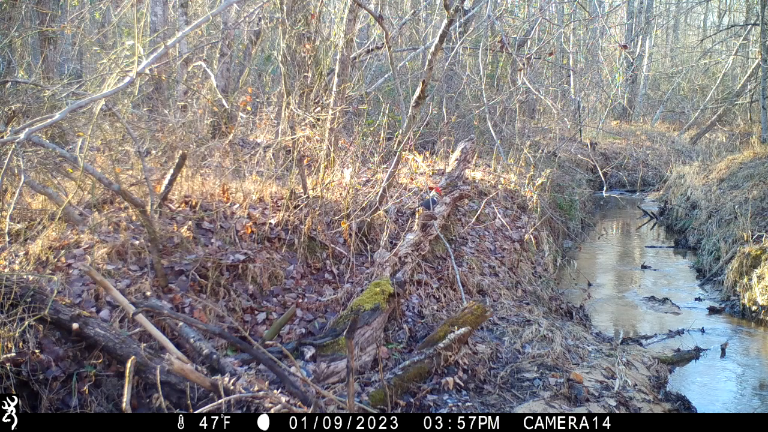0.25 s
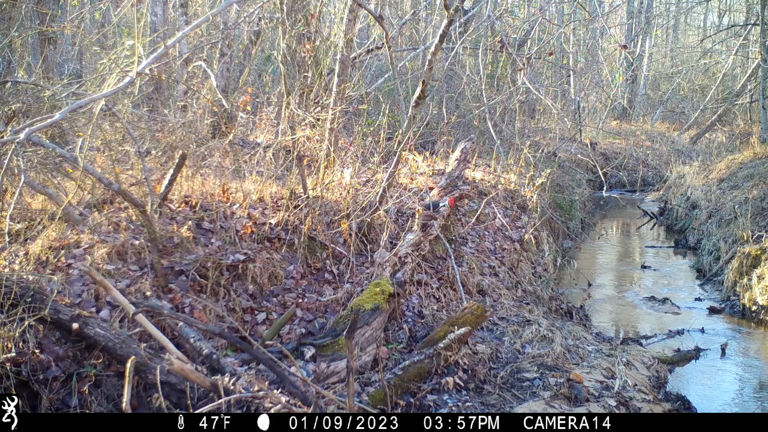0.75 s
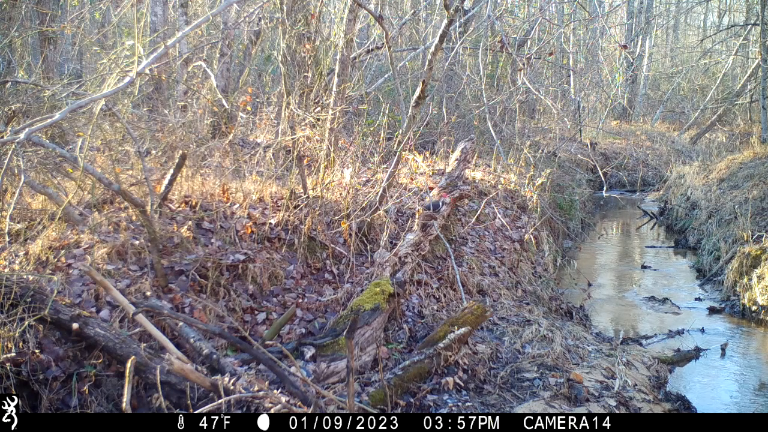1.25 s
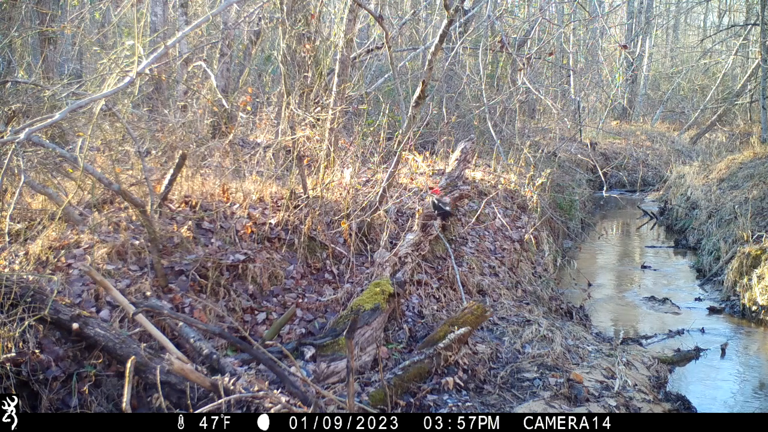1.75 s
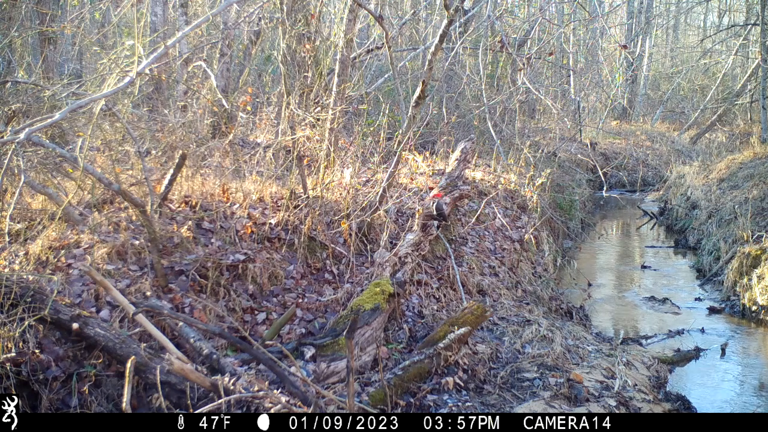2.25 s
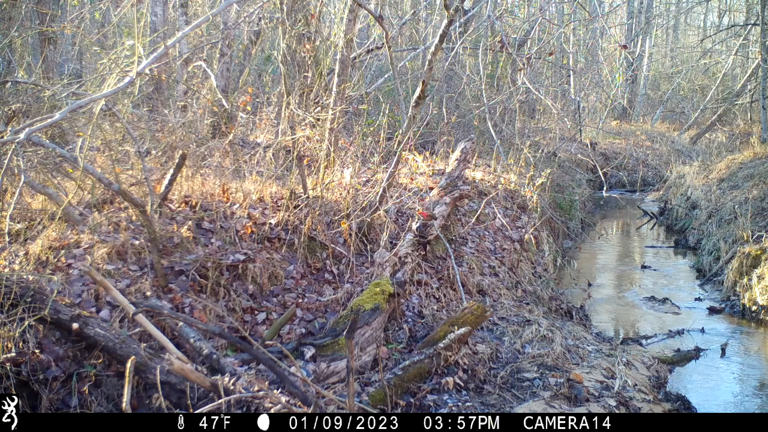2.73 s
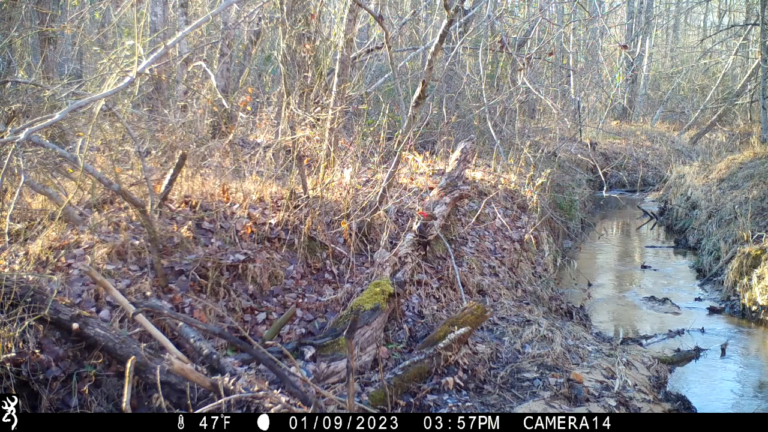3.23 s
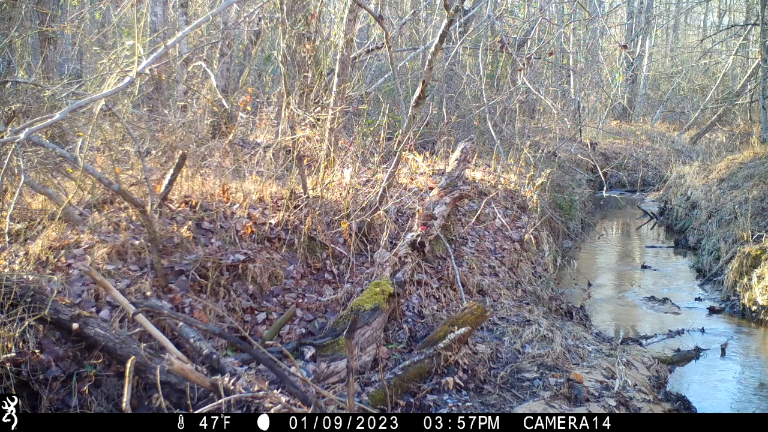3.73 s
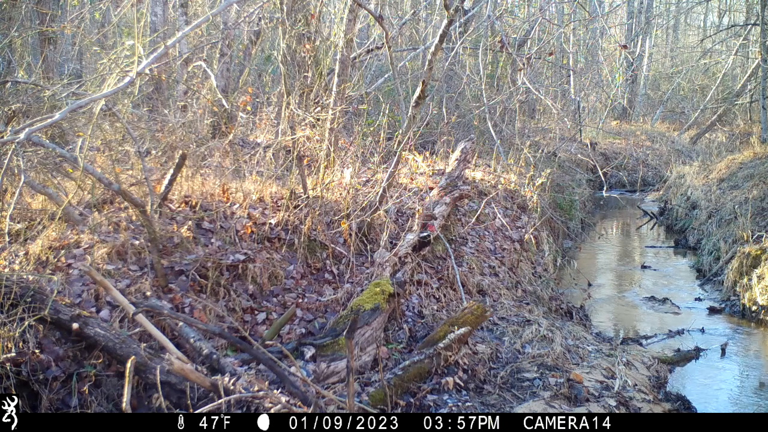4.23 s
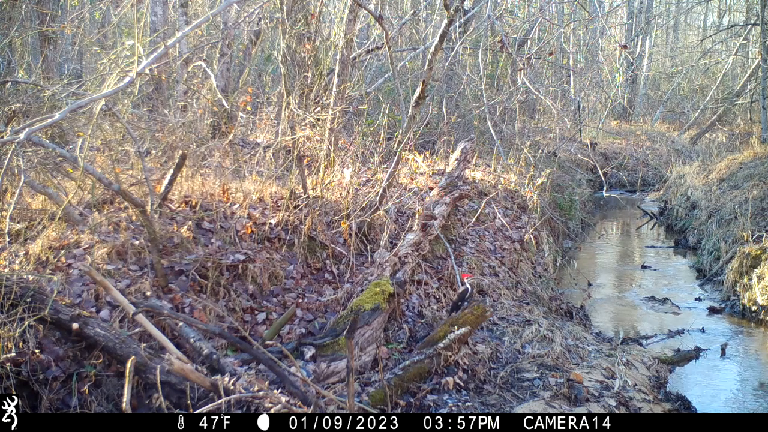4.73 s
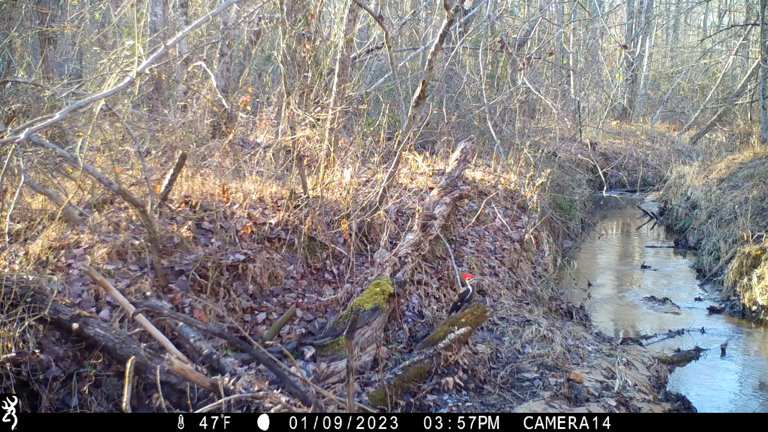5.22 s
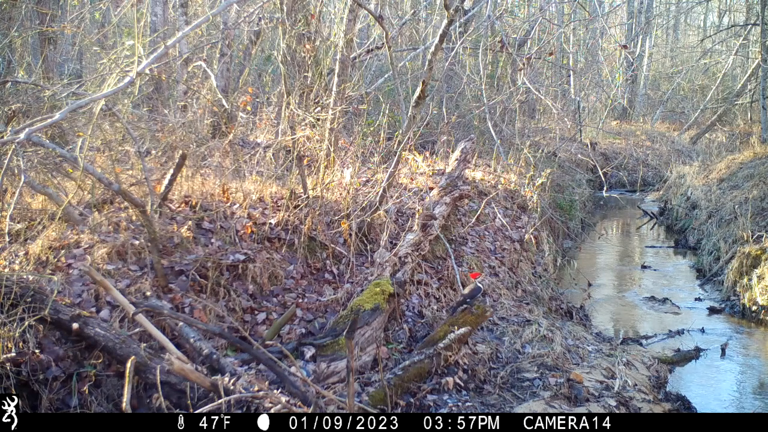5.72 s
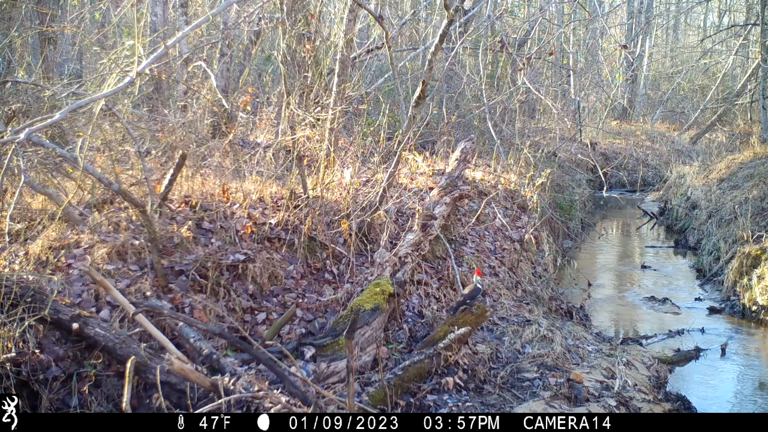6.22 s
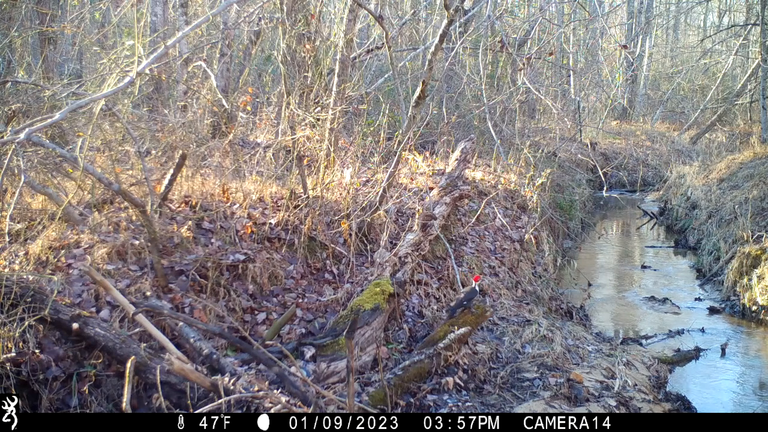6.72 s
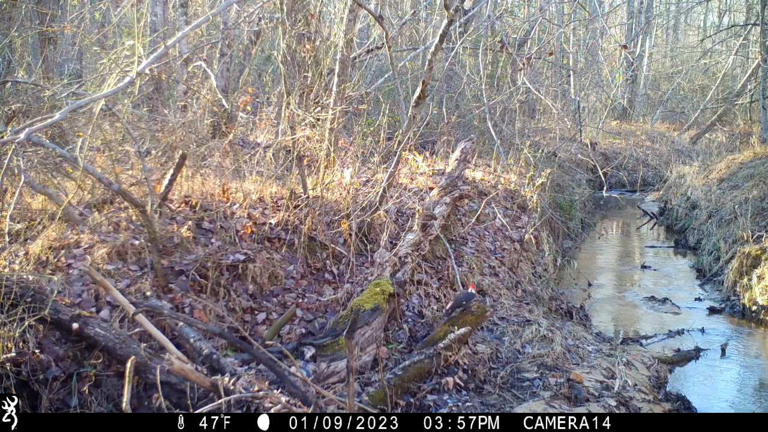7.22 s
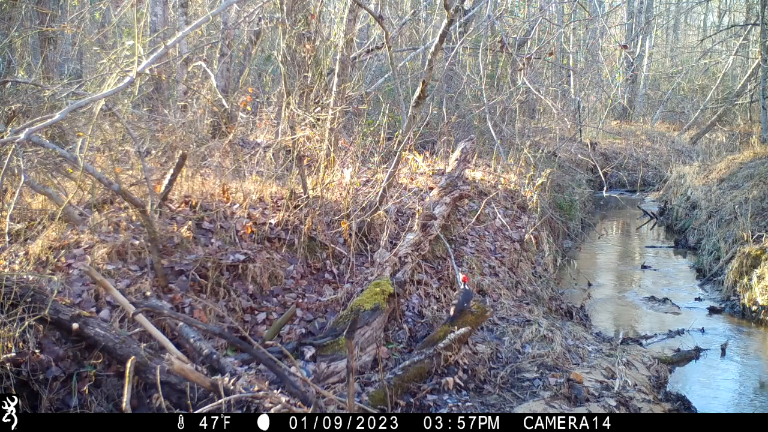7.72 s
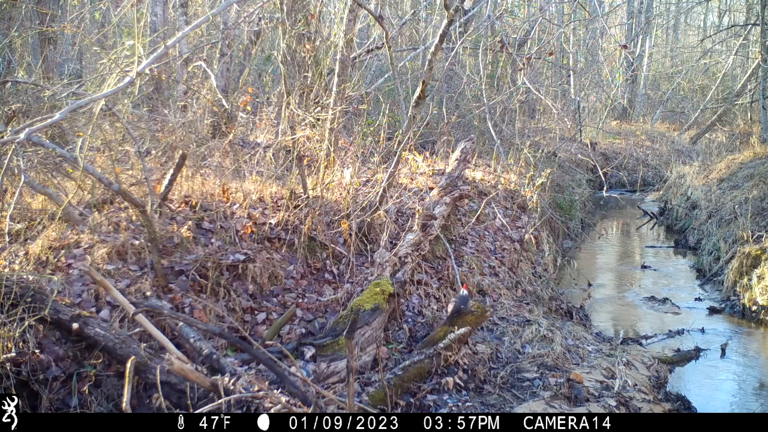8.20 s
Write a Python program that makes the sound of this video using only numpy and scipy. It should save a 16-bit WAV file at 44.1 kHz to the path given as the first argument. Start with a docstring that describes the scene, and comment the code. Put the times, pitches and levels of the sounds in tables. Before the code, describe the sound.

A woodpecker gives a steady run of short, arched yelping calls close by over a softly running creek, with a few faint knocks late.

```python
"""Short, arched woodpecker calls ring out close by, with a few knocks, over a running creek and a far drone.
Each call is a stack of five harmonics whose pitch sweeps up and down; the knocks ring the modes of dead wood.
Trunks throw the bird's sounds back as echoes and a faint tail. The creek is shaped noise with ringing bubbles,
the engine is a set of wavering sines, and the trail camera adds a thin whine and hiss."""
import sys
import numpy as np
from scipy import signal
from scipy.fft import rfft, irfft
from scipy.io import wavfile
from scipy.ndimage import uniform_filter1d

SR = 44100
rng = np.random.default_rng(int(sys.argv[2]) if len(sys.argv) > 2 else 0)


def generate_wav(signal):
    """Clip the signal to [-1, 1] and save it as 16-bit WAV at the path in sys.argv[1]."""
    frames = np.transpose(np.atleast_2d(signal))
    scaled = np.clip(frames, -1, 1) * 32767
    pcm = np.round(scaled).astype(np.int16)
    wavfile.write(sys.argv[1], SR, pcm)


N = 373086  # length of the scene in samples
TIME = np.arange(N) / SR  # seconds


def amp(db):
    """Turns decibels into a gain."""
    return 10 ** (np.asarray(db) / 20)


def unit(x):
    """Scales a signal to an rms level of 1."""
    return x / np.sqrt(np.mean(x ** 2) + 1e-20)


def bump(x, centre, width):
    """A bell curve of height 1."""
    return np.exp(-((x - centre) / width) ** 2)


def along(points, hz):
    """Reads a (frequency, value) table at any frequency, on a log-frequency axis."""
    point_hz, value = np.transpose(points)
    return np.interp(np.log(hz + 1), np.log(point_hz), value)


def add(mix, start_s, sound):
    """Mixes a sound in at a given time, cutting off what runs past the end."""
    part = mix[round(start_s * SR):][:len(sound)]
    part += sound[:len(part)]


def wander(rate_hz):
    """A random curve of rms 1: noise whose spectrum fades out above about rate_hz."""
    hz = np.fft.rfftfreq(N, 1 / SR)
    spectrum = rfft(rng.standard_normal(N))
    return unit(irfft(spectrum * np.exp(-(hz / rate_hz) ** 2), N))


def tone(hz, db):
    """A sine from a random starting phase; its pitch and rms level may be curves."""
    turns = np.cumsum(hz * np.ones(N)) / SR + rng.random()
    return np.sqrt(2) * amp(db) * np.sin(2 * np.pi * turns)


def whine(whine_hz=7788.4, level_db=-94.5, frames_per_s=59.45, count=5):
    """A thin electronic tone whose sign flips with each picture frame, which spreads it into close lines."""
    odd = 1 + 2 * np.arange(count)  # a few odd harmonics make a softened square wave
    flips = sum(np.sin(np.pi * k * frames_per_s * TIME) / k for k in odd)
    return tone(whine_hz, level_db) * unit(flips)


def engine(low_hz=74.0, high_hz=93.3, low_db=-1, high_db=0.0, waver=.004):
    """A far drone: sines whose pitches waver together, two of them fading in and out."""
    # steady tones: (frequency [Hz], rms level [dB])
    steady = [(44, -86.5), (149, -88.5)]
    # fading tones, before low_db and high_db are added: (time [s], low tone [dB], high tone [dB])
    swell = [(0.0, -82, -84), (0.04, -90, -79), (0.35, -84, -86), (1.08, -83, -76.5), (1.39, -89, -79),
             (2.17, -82.5, -77), (2.31, -92, -76), (2.87, -80, -86), (3.25, -71.5, -75), (4.0, -80, -76.5),
             (4.15, -75, -74), (4.64, -86.5, -87), (5.75, -69, -72.5), (6.6, -92, -71), (7.0, -78, -71),
             (8.2, -83, -74), (8.41, -78, -78), (8.46, -84, -85)]
    speed = 1 + waver * wander(2)
    s, low_swell, high_swell = np.transpose(swell)
    low = tone(low_hz * speed, low_db + np.interp(TIME, s, low_swell))
    high = tone(high_hz * speed, high_db + np.interp(TIME, s, high_swell))
    return low + high + sum(tone(hz * speed, db) for hz, db in steady)


def creek(level_db=-53, patchy_db=0.4, swell_db=0.26):
    """Running water some way off: shaped noise with small drifting patches and a slight swell."""
    # shape of the wash, only relative: (frequency [Hz], level per Hz [dB])
    wash_shape = [(25, -26.5), (60, -16.5), (130, -14), (250, -7), (450, -3), (800, -0.5), (1250, -0.5),
                  (2000, -4), (2800, -9.5), (4000, -19), (5200, -27), (6500, -31), (8000, -37.5),
                  (15000, -57.5)]
    frames, hz = N // 256 + 5, np.fft.rfftfreq(1024, 1 / SR)
    real, imaginary, patches = rng.standard_normal((frames, len(hz), 3)).T
    patches = uniform_filter1d(patches, size=9, axis=0)  # smooth over frequency
    patches = unit(uniform_filter1d(patches, size=10, axis=1))  # smooth over time
    gain = amp(along(wash_shape, hz)[:, None] + patchy_db * patches)
    spectrum = (real + 1j * imaginary) * gain
    wash = signal.istft(spectrum, nperseg=1024, noverlap=768)[1][:N]
    return amp(level_db + swell_db * wander(3.4)) * unit(wash)


def bubbles(level_db=-66, per_s=5, low_hz=550, high_hz=2300, cycles=9, glide=0.073):
    """Small bubbles in the riffle: each rings briefly and rises in pitch."""
    out = np.zeros(N)
    for hz in np.geomspace(low_hz, high_hz, 20):  # 20 bubble sizes, each with per_s pops a second
        turns = hz * np.arange(SR // 20) / SR
        ring = np.sin(2 * np.pi * turns * (1 + glide * turns / cycles / 2))
        ring *= np.exp(-turns / cycles) * (1 - np.exp(-turns))  # soft start, then dying away
        pops = (rng.random(N) < per_s / SR) * rng.random(N) ** 2  # mostly weak pops
        out += signal.oaconvolve(pops, ring)[:N]
    return amp(level_db) * unit(out)


def forest(x, tail_db=-20, scatter_hz=1300, count=4):
    """A few single echoes from near trunks, then a faint scattered tail that changes as the bird moves about."""
    # echoes from near trunks and the bank: (delay [s], level [dB])
    trunks = [(.0093, -21), (.0148, -17), (.0215, -23), (.031, -32.5)]
    # how long the tail rings among the trees: (frequency [Hz], time to fall by 60 dB [s])
    ring_times = [(300, 0.33), (900, 0.55), (1900, 0.51), (4000, 0.12), (8000, .2)]
    x = signal.lfilter(*signal.butter(1, scatter_hz, "high", fs=SR), x)  # thin trunks throw back little bass
    # each tail starts as one second of random reflections, about 2000 of them
    taps = rng.standard_normal((count, SR)) * (rng.random((count, SR)) < 2000 / SR)
    hz, t, z = signal.stft(taps, SR, nperseg=256)
    decay = amp(-60 * t / along(ring_times, hz)[:, None])
    tails = signal.istft(z * decay * (t > .008), SR, nperseg=256)[1]
    # the bird's sound drifts between the tails
    shares = np.array([wander(1.1) for _ in tails])
    shares /= np.linalg.norm(shares, axis=0)
    out = amp(tail_db) * sum(signal.fftconvolve(x * share, tail / np.linalg.norm(tail))[:N]
                             for share, tail in zip(shares, tails))
    for delay, db in trunks:
        add(out, delay, amp(db) * x)
    return out


def knocks(contact_s=0.0011):
    """The bill strikes soft dead wood, whose modes die at once."""
    # strikes: (time [s], gain [dB])
    strikes = [(6.3547, -27), (7.204, -32), (8.132, -40)]
    # modes of the dead branch: (frequency [Hz], relative level [dB], time to fall by 60 dB [s])
    branch = [(236, -20.5, 0.069), (397, -16.5, 0.042), (796, -11, .015), (1180, 4, 0.01),
              (1330, -4.5, 0.012), (1930, -11, 0.016)]
    out, t = np.zeros(N), np.arange(SR // 8) / SR
    ring = sum(amp(db - 60 * t / t60) * np.sin(2 * np.pi * hz * t) for hz, db, t60 in branch)
    ring *= 1 - np.exp(-t / contact_s)  # the soft contact rounds the start
    for s, db in strikes:
        add(out, s, amp(db) * ring)
    return out


def call_arch(u, slack, strain, burst):
    """Pitch as a share of the crest pitch: an arch that strain starts higher, holds down and then cracks upwards."""
    arch = 1 - 0.45 * slack + 0.34 * burst
    arch += 0.073 * strain * bump(u, 0, 0.25)  # the crack at the crest
    return arch - 0.06 * strain * bump(u, -.6, 0.28)  # held down until it cracks


def call_voice(hz, u, slack, strength_db, strain, flicker_now):
    """Five harmonics of the pitch, each following the arch; a narrow throat resonance lifts the fifth."""
    # first four harmonics, one row each: (loss at the feet of the arch [dB], dip at the crest [dB],
    #                                      further dip at full strain [dB], gain from crest to end [dB])
    harmonics = [(22.5, 0, -1, -3), (12.1, 1.5, 11.5, 1.1), (4, 12.5, 3, 3), (4, -1, -1.5, -5.5)]
    crest = bump(u, 0, 0.45)
    first, octave, third, fourth = (
        db - loss_db * slack - (dip_db + strain_db * strain) * crest + lean_db * u
        for db, (loss_db, dip_db, strain_db, lean_db) in zip(strength_db, harmonics))
    # the fifth is faint against the octave, brighter under strain
    fifth = octave - 49 + 9.5 * strain + 5.5 * bump(5 * hz, 4950, 250)
    levels = [first, octave, *([third, fourth, fifth] + flicker_now)]
    phase = 2 * np.pi * np.cumsum(hz) / SR
    return sum(amp(db) * np.sin(k * phase) for k, db in enumerate(levels, 1))


def call_effort(t, u, rise, fall, catch_db, strain, burst):
    """Loudness in dB: quick attack and release, a brief catch before the crest, and pushes under strain."""
    attack = 1603 * np.maximum(-t - rise, 0)  # dB, at 1603 dB a second
    release = 2400.5 * np.maximum(t - 0.69 * fall, 0)  # dB, at 2400.5 dB a second
    catch = catch_db * bump(u, -0.79, 0.17)
    # strain makes the start harder and swells once more on the way down
    forced = 5 * burst + 5.5 * strain * bump(u, 0.55, 0.13)
    return forced - attack - release - catch


def yelp(row, jitter, shimmer, flicker):
    """One call: the pitch sweeps up to a crest and down again, trembling least at the crest."""
    s, crest_hz, length, *strength_db, catch_db, strain = row
    rise, fall = .44 * length, (1 - .44) * length  # seconds before and after the crest
    # strain trims the lead-in
    t = np.arange(-1.6 * rise * (1 - .19 * strain), 1.7 * fall, 1 / SR)
    u = t / np.where(t < 0, rise, fall)  # -1 one rise before the crest, +1 one fall after it
    now = round(s * SR) + np.arange(len(t))
    loose = (.5 + np.minimum(u ** 2, 1)) * (1 + 1.4 * strain)  # rougher under strain
    burst = strain * np.maximum(-u - .75, 0)  # extra force at the start
    slack = 1 - np.exp(-abs(u / 1.15) ** 2.62)  # 0 at the crest, near 1 at the feet; flat on top
    hz = crest_hz * call_arch(u, slack, strain, burst) * (1 + loose * jitter[now])
    voice = call_voice(hz, u, slack, strength_db, strain, flicker[:, now])
    effort_db = call_effort(t, u, rise, fall, catch_db, strain, burst) + loose * shimmer[now]
    return s + t[0], voice * amp(effort_db) * signal.windows.tukey(len(t), .16)


def woodpecker(unsteady=0.012, shimmer_db=0.9, flicker_db=3.0, count=3):
    """The run of calls: pitch and strength tremble slightly, and each upper harmonic flickers by itself."""
    # one row a call; levels are starting points that the voice then shapes; a negative catch is a lift:
    # (time of the crest [s], crest pitch [Hz], length [s], fundamental [dB], octave [dB], third harmonic [dB],
    #  fourth harmonic [dB], depth of the catch in the voice [dB], strain [0-1])
    calls = [(0.1938, 926, 0.042, -39, -36, -44, -64, 2, .05),
             (0.4684, 980, 0.045, -33.5, -40.5, -54, -68, 4, 0.08),
             (0.9987, 962, 0.045, -34, -36.5, -49.5, -72, 5, 0.01),
             (1.334, 941, 0.038, -36, -30.5, -41, -72, 9.5, 0),
             (1.7887, 1032, 0.04, -32, -27.5, -45.5, -63.5, 4.5, 0.23),
             (2.047, 932, 0.034, -34.5, -28.5, -38, -68, 4.5, 0.11),
             (2.315, 983, 0.043, -32, -27.5, -41, -79, 16, 0.21),
             (2.534, 955, 0.037, -37.5, -32.5, -41.5, -69, -2.5, 0),
             (2.78, 867, 0.041, -40, -35.5, -45, -76, -2, 0.29),
             (3.0705, 908, 0.042, -36, -33.5, -45.5, -73, 1.5, 0),
             (3.3016, 916, 0.043, -36, -34, -46, -73, -2.5, 0),
             (3.5364, 950, 0.051, -34.5, -34.5, -47, -66, 0.5, 0.13),
             (3.8036, 934, 0.042, -34, -30, -44.5, -66, 8.5, 0.2),
             (4.1155, 933, 0.043, -34.5, -35.5, -41.5, -66, 5, 0.09),
             (4.3273, 951, 0.047, -37.5, -29.5, -51, -64.5, -3, .62),
             (4.4878, 956, .046, -33.5, -31, -40.5, -69, 3, .95),
             (4.749, 969, 0.033, -32, -27, -40.5, -68, 9.5, 0),
             (4.969, 981, 0.038, -33, -26, -40.5, -72, 7, 0.06),
             (5.245, 972, .041, -33, -28, -41, -70.5, 6, 0),
             (5.4704, 924, 0.036, -35.5, -26, -44.5, -68, 6, 0.5),
             (5.7503, 919, 0.039, -39, -26, -45, -69, -1, 0.15),
             (6.0205, 925, 0.039, -38.5, -26, -43, -67, 0.5, 0.15),
             (6.8042, 915, 0.04, -38.5, -29.5, -43, -65, 1, 0.14)]
    out = np.zeros(N)
    jitter = unsteady * wander(170)  # share of the pitch; each call scales it
    shimmer = shimmer_db * wander(220)  # dB; each call scales it
    flicker = flicker_db * np.array([wander(47) for _ in range(count)])  # third to fifth harmonic
    for row in calls:
        add(out, *yelp(row, jitter, shimmer, flicker))
    return out


def scene():
    """The bird among the trees, over the creek and the drone."""
    bird = woodpecker() + knocks()
    return (bird + forest(bird) + creek() + bubbles() + engine())[None]


def record(dry, ceiling=0.19, treble_hz=5200, hiss_db=-85.5, edge_hz=15000):
    """The camera rounds off the loudest calls, dulls the treble, adds its whine and hiss, and limits the band."""
    rounded = ceiling * np.tanh(dry / ceiling)
    rounded *= signal.windows.tukey(N, 256 / N)  # very short fades at both ends
    dull = signal.sosfilt(signal.butter(4, treble_hz, fs=SR, output="sos"), rounded)
    own = whine() + amp(hiss_db) * rng.standard_normal(N)
    lowpass = signal.firwin(511, edge_hz, window=("kaiser", 9), fs=SR)
    return signal.oaconvolve(dull + own, lowpass[None], "same")


dry = scene()
out = record(dry)
generate_wav(out)
```